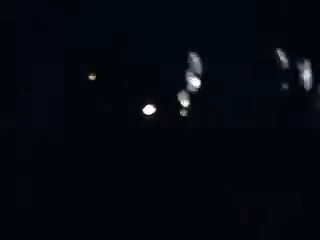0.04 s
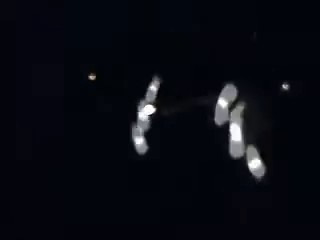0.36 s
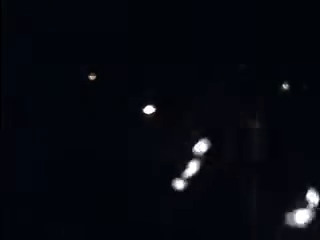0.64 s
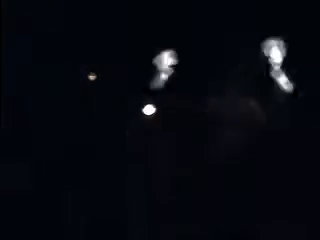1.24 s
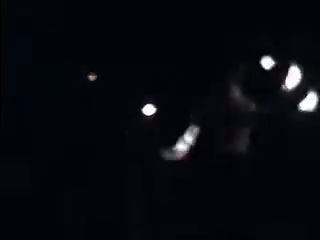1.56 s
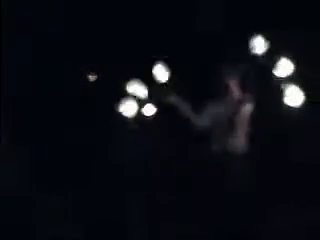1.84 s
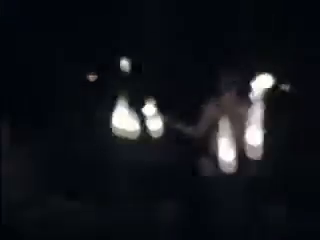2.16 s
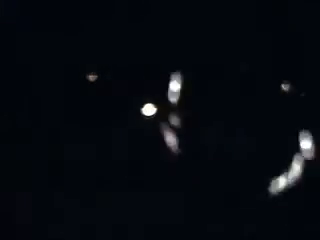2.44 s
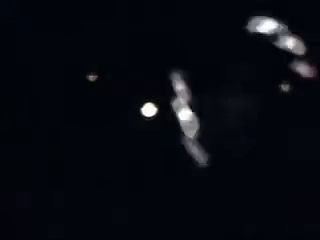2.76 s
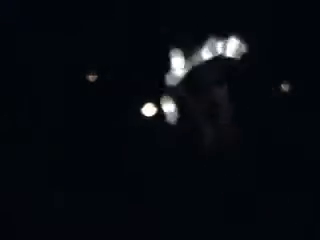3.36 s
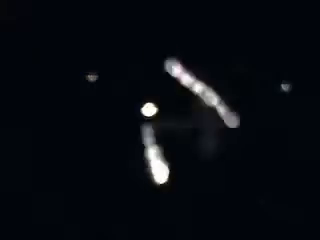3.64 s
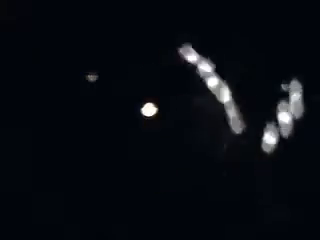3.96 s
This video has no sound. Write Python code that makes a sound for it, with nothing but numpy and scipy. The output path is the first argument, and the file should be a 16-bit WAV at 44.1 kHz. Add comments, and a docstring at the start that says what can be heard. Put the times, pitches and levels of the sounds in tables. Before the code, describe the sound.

Flames whoosh as two burning fans are swung outdoors, a few metres from the microphone. The low roar swells and dips repeatedly, with soft puffs and a hiss on the fastest sweeps, over a light breeze.

```python
"""Two burning fire fans are swung through the night air, outdoors, a few metres away.
The flames roar louder and fuller as the swing speeds up, hiss on the fastest sweeps, and puff
over a low rumble. The wicks spit and cut the air with short hollow notes. An echo from the ground
colours the roar, sinking in pitch as the fans rise. Underneath lie a light breeze on the
microphones, a faint even hiss and the thin pulsing whine of a camera's electronics."""
import sys
import numpy as np
from scipy import signal
from scipy.io import wavfile
from scipy.ndimage import uniform_filter1d

SR = 44100
rng = np.random.default_rng(int(sys.argv[2]) if len(sys.argv) > 2 else 0)


def master_out(mix):
    """Clip the mix to full scale and print it as 16-bit PCM to the path in sys.argv[1]."""
    frames = np.transpose(np.atleast_2d(mix))
    ceiling = np.clip(frames, -1, 1)
    pcm = np.round(ceiling * 32767).astype(np.int16)
    wavfile.write(sys.argv[1], SR, pcm)


N = 176400

# The tone colour of each noise, from low to high: frequency_hz, relative_db
BACKGROUND_COLOUR = [(40, 4), (300, 3), (1000, 4), (2500, 5), (5000, 7), (6500, 3.5), (9500, 5),
                     (12500, -25)]
BREEZE_COLOUR = [(15, -20), (45, 1.5), (80, -1), (130, -13), (220, -19), (450, -40.5), (900, -28.5),
                 (1500, -50)]
HISS_COLOUR = [(600, -5), (1500, 1.5), (2500, -2.5), (4500, -7), (6500, -20), (9500, -14.5), (12500, -25)]
RUMBLE_COLOUR = [(15, 13), (28, -15.5), (42, -2), (58, 1.5), (80, -4), (112, -3.5), (135, -5.5),
                 (165, -13.5), (215, -6.5), (400, -29), (1000, -43)]
ROAR_COLOUR = [(110, -10), (220, 0), (330, -1), (450, -1), (620, -4.5), (800, -7), (1050, -9),
               (1400, -12.5), (2000, -20), (3000, -27), (4800, -35.5), (6500, -45), (12000, -46.5)]
# The tones of the electronics: pitch_hz, base_level_db
WHINE_TONES = [(4488, -62), (5988, -68.5), (7105, -78), (7488, -77)]
# The two pulses of whine in each camera frame: centre_s, length_s, gain_db
WHINE_PULSES = [(.002, 0.013, 3), (0.02, 0.0085, -29)]
# How the breeze rises and falls: time_s, level_db
BREEZE_STRENGTH = [(0, -45), (.85, -46), (1.12, -48), (1.4, -47), (2.05, -45.5), (2.45, -38.5),
                   (2.8, -42.5), (3.15, -36), (3.42, -47), (3.85, -39), (4, -39)]
# Brief spits of fuel: centre_s, level_db, half_length_s, pitch_hz
FUEL_SPITS = [(0.39, -53, 0.036, 4570), (1.854, -54, .016, 4550), (2.6, -57, 0.0086, 9500),
              (2.838, -50, 0.017, 4870)]
# The fastest sweeps, where the flames tear and hiss: centre_s, level_db, half_length_s
FAST_SWEEPS = [(0.522, -41, 0.049), (1.214, -40.5, 0.092), (2.294, -47.5, 0.067), (2.865, -49.5, 0.24),
               (3.226, -51, 0.045), (3.783, -41, 0.1)]
# Notes of the passing wicks: centre_s, relative_db, half_length_s, pitch_hz, glide_octaves_per_s
WICK_NOTES = [(0.185, -31, 0.053, 440, 0), (0.533, -30.5, 0.034, 460, .6), (.625, -32.5, 0.045, 696, -.4),
              (0.82, -36, 0.045, 220, 0), (1.11, -27.5, 0.035, 215, 1), (1.17, -30.5, 0.058, 676, -.3),
              (1.15, -36, 0.059, 886, -1.1), (1.43, -33, .08, 423.6, .4), (1.73, -37, 0.038, 725, 0.096),
              (1.782, -33.5, 0.033, 502, 0.63), (2.321, -30, 0.058, 520, 0.74), (2.46, -33, .03, 910, -.5),
              (2.779, -29.5, 0.035, 345, -1), (2.908, -37.5, 0.053, 1002, -1.2),
              (2.954, -33, .03, 596, 0.19), (3.31, -30.5, 0.11, 447.7, -0.48),
              (3.62, -29.5, 0.062, 385.7, -.8), (3.74, -32, 0.11, 753, 0.47), (3.862, -27.5, 0.029, 516, 0)]
# Single flaps of a flame: centre_s, peak_db, pitch_hz
FLAME_PUFFS = [(0.087, -19, 58.4), (.635, -19, 56), (.775, -20.5, 199), (1.058, -15, 62), (1.09, -15, 196),
               (1.147, -17, 213), (1.211, -13, 68), (1.547, -17, 48.3), (1.73, -15.5, 73.6),
               (2.35, -15.5, 97), (3.25, -14.5, 62), (3.579, -31.5, 60), (3.81, -16, 57.6)]
# How the rumble rises and falls: time_s, relative_db
RUMBLE_STRENGTH = [(0, -29), (.11, -23.5), (.28, -28), (.47, -26.5), (.66, -27), (.92, -34.5), (1.08, -23),
                   (1.23, -22.5), (1.35, -30), (1.62, -31), (1.76, -28.5), (1.93, -34.5), (2.08, -34),
                   (2.19, -26.5), (2.35, -28), (2.47, -26), (2.62, -26.5), (2.75, -33), (2.85, -25.5),
                   (2.94, -32), (3.03, -25.5), (3.2, -28.5), (3.42, -27), (3.6, -26), (3.73, -31),
                   (3.88, -28), (4, -28)]
# How late the ground echo comes, later when the flames are high: time_s, delay_ms
ECHO_DELAY = [(0, 1.53), (.2, 2.9), (.38, 2.57), (.52, 2.03), (.66, 1.32), (.85, 1.1), (1.1, 1.42),
              (1.21, 1.95), (1.3, 2.44), (1.52, 3.44), (1.64, 1.9), (1.75, 1.64), (1.87, 2.26),
              (1.97, 2.85), (2.18, 2.85), (2.44, 1.38), (2.58, 1.43), (2.68, 2.8), (2.88, 2.5),
              (3.02, 1.05), (3.27, 2.3), (3.43, 3), (3.7, 2.62), (3.82, 2.68), (3.94, 1.63)]
# The swing, as the ups and downs of the roar's bright rush and low body: time_s, rush_db, body_db
FAN_SWING = [(0, -34.5, -29), (.14, -37, -30.5), (.3, -40, -30.5), (.54, -30.5, -27.5), (.75, -43.5, -32.5),
             (.92, -62, -42.5), (1.06, -37, -32.5), (1.21, -29.5, -26), (1.33, -38.5, -30),
             (1.44, -44, -31), (1.57, -44, -34), (1.75, -39.5, -33.5), (1.88, -56, -38.5), (2.06, -55, -37),
             (2.26, -35.5, -28.5), (2.48, -36.5, -29), (2.72, -38.5, -29), (2.87, -33.5, -28.5),
             (3.08, -38, -29), (3.25, -37.5, -29.5), (3.42, -41, -33), (3.65, -34, -28), (3.8, -33, -26.5),
             (4, -30.5, -29)]
# How much of the roar is rush, the rest being body: frequency_hz, share_0_to_1
RUSH_MIX = [(450, 0), (900, 0.94)]
# How strongly the roar follows the swing: frequency_hz, roar_db_per_swing_db
SWING_RESPONSE = [(150, 2.55), (400, 1.12), (900, 0.5), (2000, 0.56), (6000, 0.5)]

FRAME_S, WHINE_WANDER_HZ = 0.04, 2.6
BREEZE_GUST_DB, BREEZE_PAN_DB = 2, 2.5
BACKGROUND_DB, HISS_FLUTTER_DB = -55.5, 1
SPIT_WIDTH_OCTAVES, PUFF_CYCLES = 0.5, 0.72
WHOOSH_WIDTH_SHARE, WHOOSH_GAIN_DB, WHOOSH_STEADY_S = 0.076, -2.5, 0.096
RUMBLE_GAIN_DB, RUMBLE_FLUTTER_DB, RUMBLE_STEADY_S, LOW_PAN_DB = -1, 1.65, 0.11, 0.5
ECHO_DB, ECHO_CUTOFF_HZ = -9.5, 690
ROAR_DB, ROAR_FLUTTER_DB, ROAR_BAND_FLUTTER_DB = -30.5, 0.9, 0.79
TREBLE_CUTOFF_HZ = 12700


def from_db(db):
    """Turn decibels into a number to multiply a sound by."""
    return 10 ** (np.asarray(db) / 20)


def rms_one(x):
    """Scale a signal so that its average strength (rms) is 1."""
    return x / np.sqrt(np.mean(x ** 2) + 1e-20)


def clock():
    """The time of each sample in seconds."""
    return np.arange(N) / SR


def in_time(rows):
    """Join (time_s, value) points with straight lines."""
    return np.interp(clock(), *np.transpose(rows))


def at_hz(points, hz):
    """Read between (frequency_hz, value) points, with octaves evenly spaced."""
    frequencies, values = np.transpose(points)
    return np.interp(np.log(hz), np.log(frequencies), values)


def drift(rate_hz):
    """A smooth random wobble of about plus or minus 1, quicker at a higher rate."""
    step = 40  # samples between random points
    memory = np.exp(-2 * np.pi * rate_hz * step / SR)
    noise = rng.standard_normal(N // step + 2002)
    smooth = signal.lfilter([1], [1, -2 * memory, memory ** 2], noise)[2000:]
    return np.interp(np.arange(N) / step, np.arange(len(smooth)), rms_one(smooth))


def noise_bands(colour, width_db):
    """Yield (centre_hz, stereo noise), three bands an octave; at width_db 0 the sides are unrelated."""
    edges = 18 * 2 ** (np.arange(30) / 3)
    centres = np.sqrt(edges[1:] * edges[:-1])
    in_range = (edges[1:] > colour[0][0]) & (edges[:-1] < colour[-1][0])
    gains = from_db(at_hz(colour, centres)) * np.sqrt(np.diff(edges)) * in_range
    gains = gains / np.linalg.norm(gains)
    spread = from_db(width_db) * np.array([[1], [-1]])
    white = [rng.standard_normal(N) + spread * rng.standard_normal(N) for _ in range(2)]
    for k in np.flatnonzero(gains):
        band_filter = signal.butter(2, edges[k:k + 2], "band", fs=SR, output="sos")
        padded = np.pad(white[k % 2], ((0, 0), (SR // 10, 0)), "wrap")  # lets the filter settle
        yield centres[k], gains[k] * rms_one(signal.sosfilt(band_filter, padded)[:, -N:])


def coloured_noise(colour, width_db):
    """Steady stereo noise: all the bands added together."""
    return sum(band for _, band in noise_bands(colour, width_db))


def lean_right(db):
    """Gains that turn the left side down and the right side up."""
    return from_db(db * np.array([[-1], [1]]))


def background_hiss():
    """The night air and the microphones hiss faintly and evenly."""
    return from_db(BACKGROUND_DB) * coloured_noise(BACKGROUND_COLOUR, width_db=0.5)


def camera_whine():
    """The electronics give thin high tones that switch on twice in every frame."""
    phases = [2 * np.pi * np.cumsum(hz + WHINE_WANDER_HZ * drift(16)) / SR for hz, _ in WHINE_TONES]
    out = 0
    for k, (centre_s, length_s, gain_db) in enumerate(WHINE_PULSES):
        offset_s = (clock() - centre_s + FRAME_S / 2) % FRAME_S - FRAME_S / 2
        switched_on = abs(offset_s) < length_s / 2
        shift = k * np.pi / 2  # the second pulse is a quarter cycle ahead
        tones = sum(from_db(db) * np.sin(phase + shift) for phase, (_, db) in zip(phases, WHINE_TONES))
        out = out + uniform_filter1d(from_db(gain_db) * switched_on, size=64) * tones
    return out * np.sqrt(2)


def breeze():
    """Light air buffets each microphone on its own, the right one a little more."""
    gusts = from_db(in_time(BREEZE_STRENGTH) + BREEZE_GUST_DB * drift(3.9))
    return lean_right(BREEZE_PAN_DB) * gusts * coloured_noise(BREEZE_COLOUR, width_db=0)


def fuel_spits():
    """Fuel spits from the wicks in short, high sizzles."""
    out = np.zeros(N)
    for centre_s, db, half_s, hz in FUEL_SPITS:
        edges = hz * 2 ** (SPIT_WIDTH_OCTAVES * np.array([-0.5, 0.5]))
        band_filter = signal.butter(1, edges, "band", fs=SR, output="sos")
        sizzle = rms_one(signal.sosfilt(band_filter, rng.standard_normal(N)))
        swell = np.exp(-0.5 * ((clock() - centre_s) / half_s) ** 2)
        out += from_db(db) * swell * sizzle
    return out


def sweep_hiss():
    """Tiny swirls of air hiss, swelling and fading around each fast sweep."""
    swell = 0
    for centre_s, db, half_s in FAST_SWEEPS:
        swell += from_db(db) / (1 + ((clock() - centre_s) / half_s) ** 2)
    flutter = from_db(HISS_FLUTTER_DB * drift(70))
    return swell * flutter * coloured_noise(HISS_COLOUR, width_db=-46)


def wick_whooshes():
    """A passing wick sheds swirls of air: a hollow, breathy note that glides, swells and fades."""
    out = np.zeros(N)
    for centre_s, db, half_s, hz, glide in WICK_NOTES:
        offset_s = clock() - centre_s
        phase = 2 * np.pi * np.cumsum(hz * 2 ** (glide * offset_s)) / SR
        width_hz = WHOOSH_WIDTH_SHARE * hz
        swirls = drift(width_hz) * np.cos(phase) + drift(width_hz) * np.sin(phase)
        strength = np.sqrt(uniform_filter1d(swirls ** 2, size=int(WHOOSH_STEADY_S * SR)))
        swell = np.exp(-0.5 * (offset_s / half_s) ** 2)
        out += from_db(db + WHOOSH_GAIN_DB) * swell * swirls / strength
    return out


def flame_puffs():
    """A pocket of fuel vapour flares and collapses, giving one short, low push of air."""
    out = np.zeros(N)
    for centre_s, db, hz in FLAME_PUFFS:
        cycles = (clock() - centre_s) * hz
        swell = np.exp(-(cycles / PUFF_CYCLES) ** 2)
        out += from_db(db) * swell * np.cos(2 * np.pi * cycles)
    return signal.sosfilt(signal.butter(1, 10, "high", fs=SR, output="sos"), out)


def flame_rumble():
    """The flames billow slowly and make a deep rumble."""
    bands = noise_bands(RUMBLE_COLOUR, width_db=-36)
    billows = sum(band * from_db(RUMBLE_FLUTTER_DB * drift(27)) for _, band in bands)
    power = np.mean(billows ** 2, axis=0)
    evened_out = billows / np.sqrt(uniform_filter1d(power, size=int(RUMBLE_STEADY_S * SR)))
    return evened_out * from_db(in_time(RUMBLE_STRENGTH) + RUMBLE_GAIN_DB)


def add_ground_echo(direct):
    """A dull echo off the ground weakens some pitches: a hollow colour that moves with its delay."""
    dull = signal.sosfilt(signal.butter(1, ECHO_CUTOFF_HZ, fs=SR, output="sos"), direct)
    filter_delay_s = 1 / (2 * np.pi * ECHO_CUTOFF_HZ)  # dulling already delays the sound this much
    sent_s = clock() + filter_delay_s - in_time(ECHO_DELAY) / 1000
    echo = np.array([np.interp(sent_s, clock(), side) for side in dull])
    return direct + from_db(ECHO_DB) * echo


def flame_roar():
    """Fire churns behind the wicks: a low body and a bright rush flutter and swell with the swing."""
    times_s, *levels = np.transpose(FAN_SWING)
    rush_db, body_db = (np.interp(clock(), times_s, level - level.mean()) for level in levels)
    out = 0
    for hz, band in noise_bands(ROAR_COLOUR, width_db=-58):
        rush_share = at_hz(RUSH_MIX, hz)
        swing_db = rush_share * rush_db + (1 - rush_share) * body_db
        flutter_db = ROAR_BAND_FLUTTER_DB * drift(43)
        out = out + band * from_db(at_hz(SWING_RESPONSE, hz) * swing_db + flutter_db)
    return out * from_db(ROAR_DB + ROAR_FLUTTER_DB * drift(85))


def scene():
    """The flames are straight ahead above the ground, their low sounds a little to the right."""
    pan = lean_right(LOW_PAN_DB)
    flames = add_ground_echo(flame_roar() + pan * flame_rumble())
    fans = flames + pan * flame_puffs() + wick_whooshes() + sweep_hiss() + fuel_spits()
    return fans + breeze() + background_hiss() + camera_whine()


def record(dry):
    """Cut off the highest treble steeply."""
    return signal.sosfilt(signal.ellip(12, 0.2, 90, TREBLE_CUTOFF_HZ, fs=SR, output="sos"), dry)


dry = scene()
out = record(dry)
master_out(out)
```